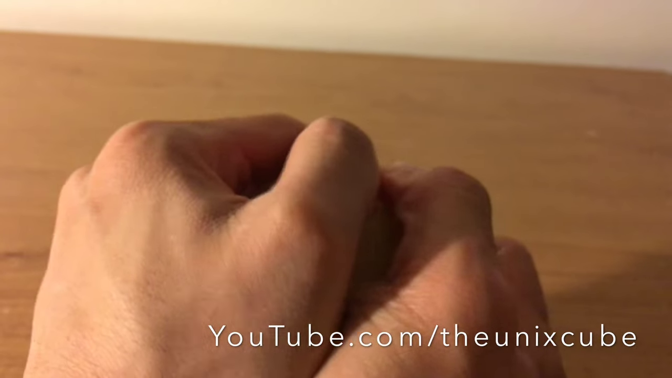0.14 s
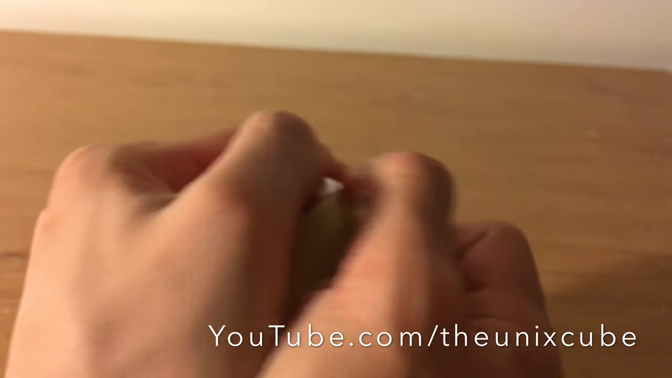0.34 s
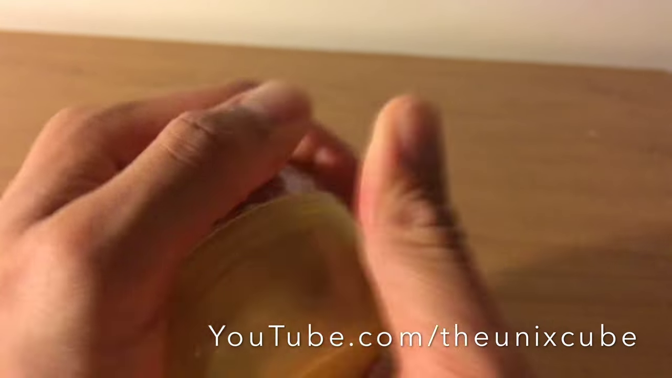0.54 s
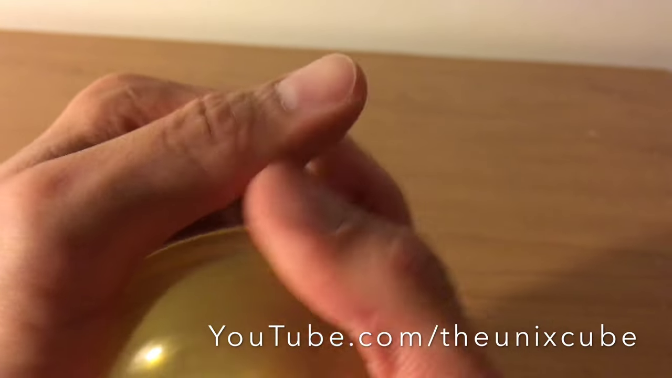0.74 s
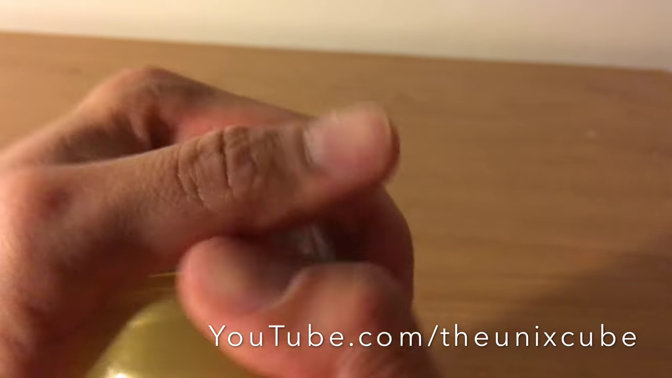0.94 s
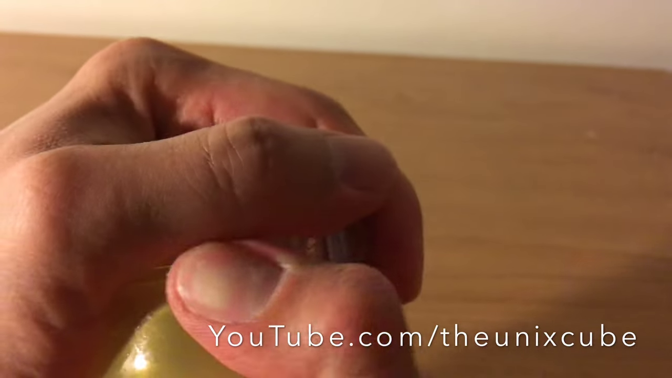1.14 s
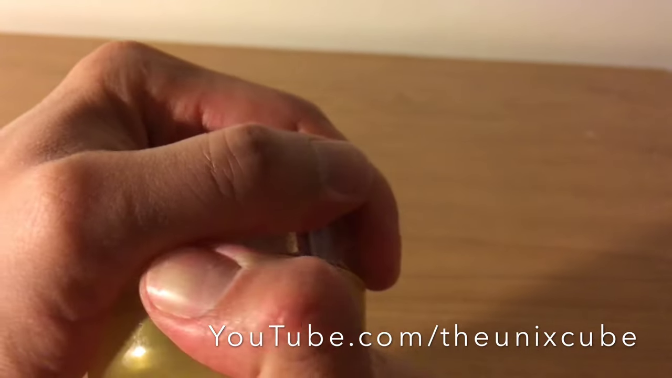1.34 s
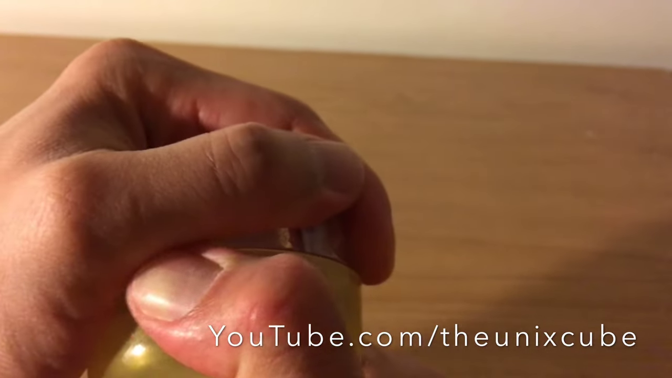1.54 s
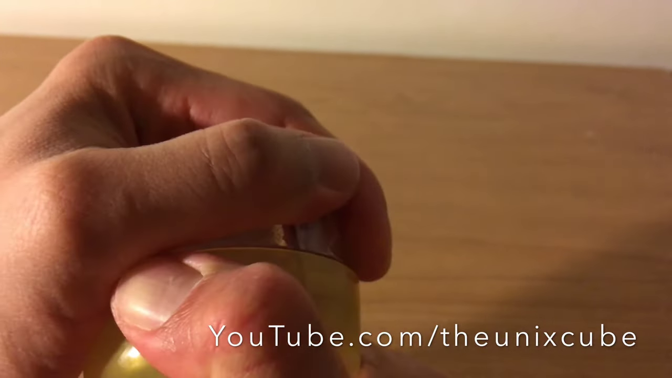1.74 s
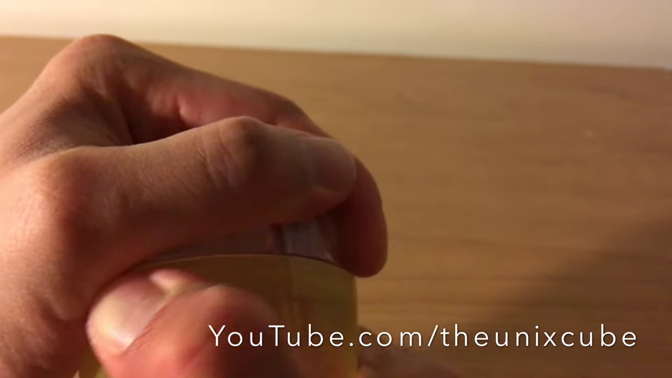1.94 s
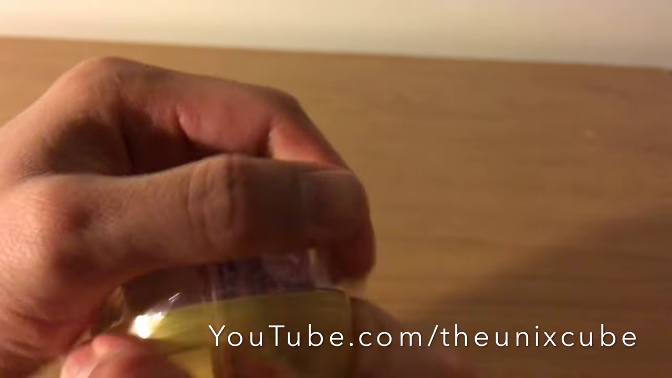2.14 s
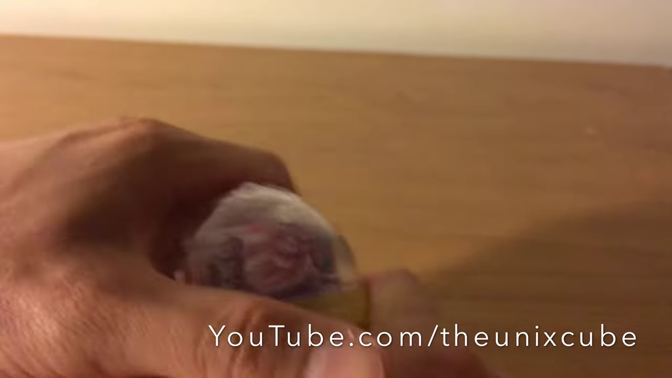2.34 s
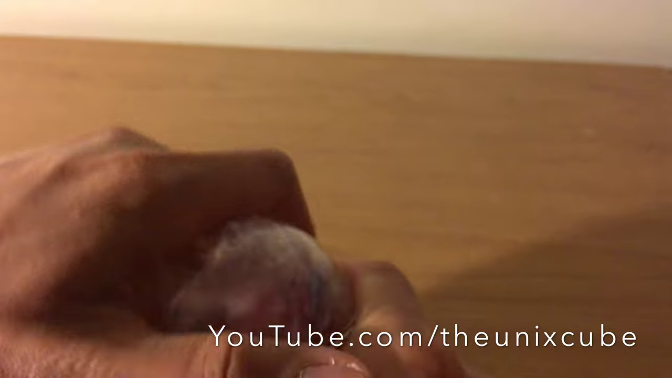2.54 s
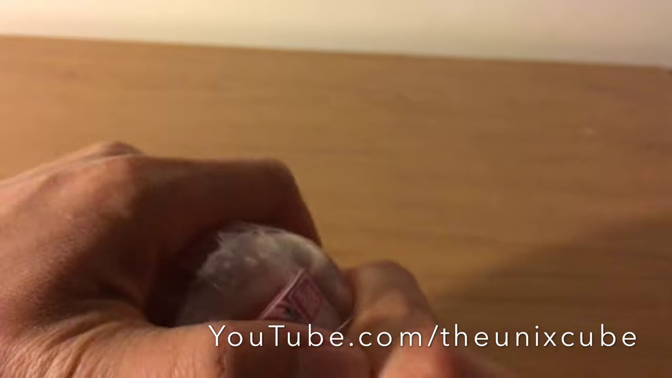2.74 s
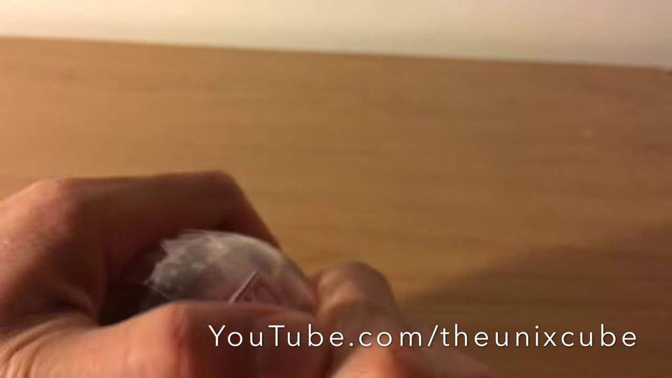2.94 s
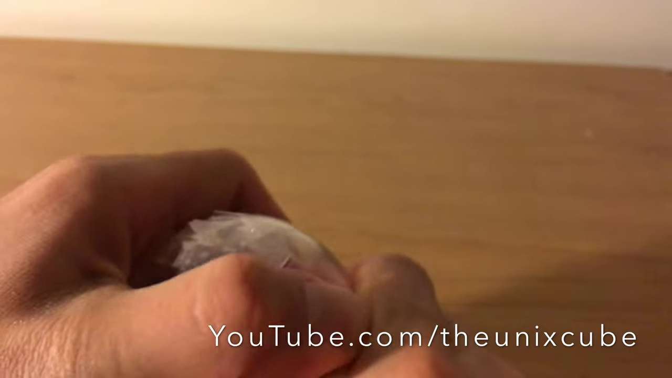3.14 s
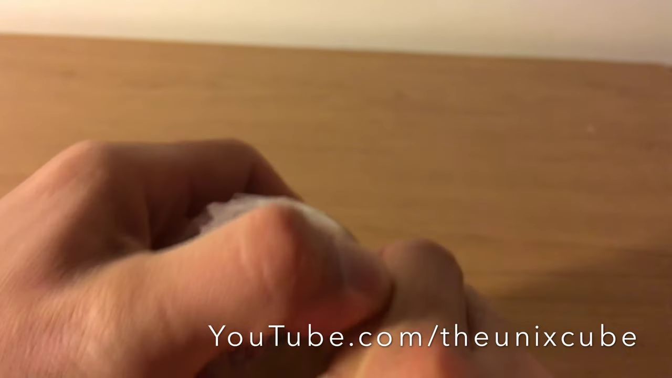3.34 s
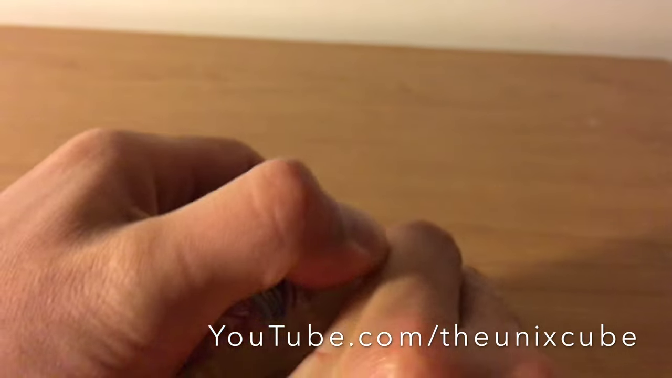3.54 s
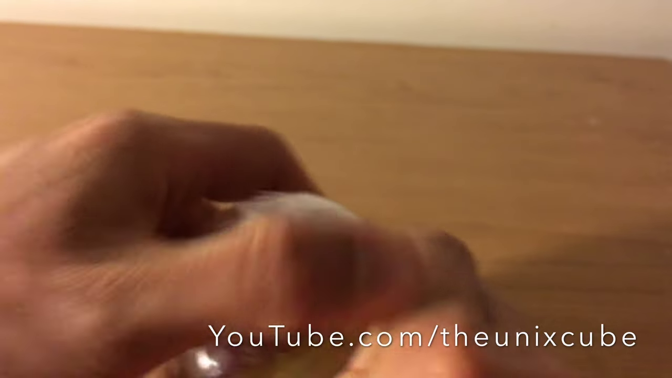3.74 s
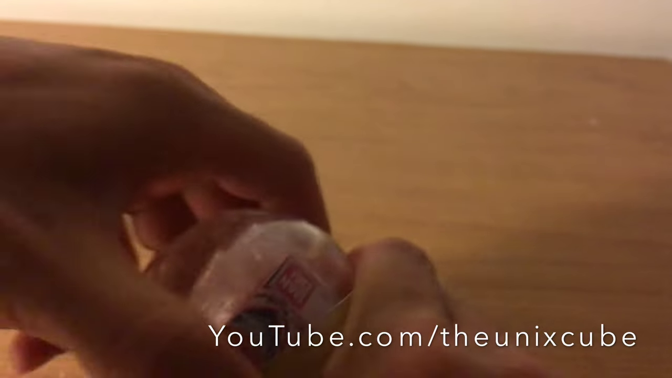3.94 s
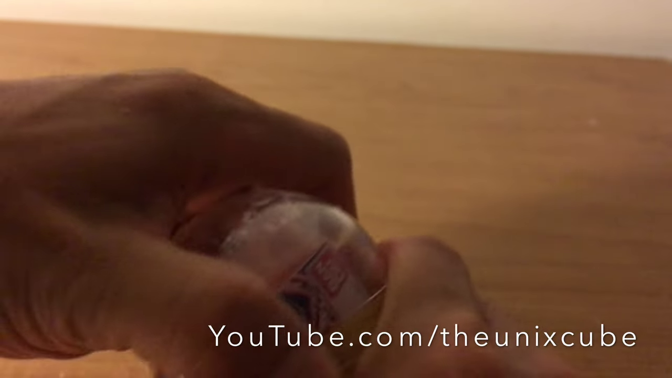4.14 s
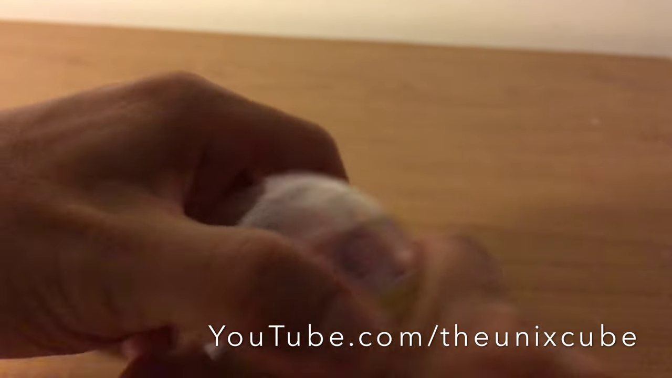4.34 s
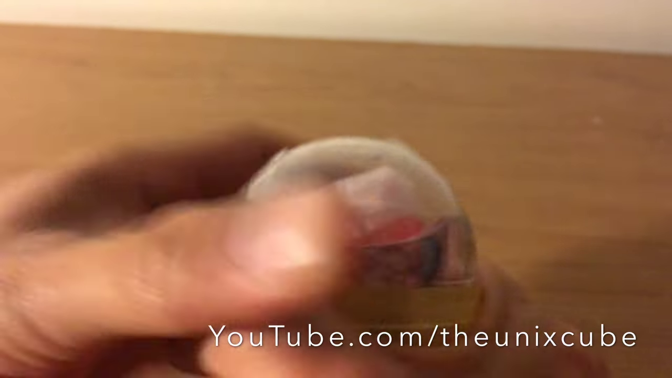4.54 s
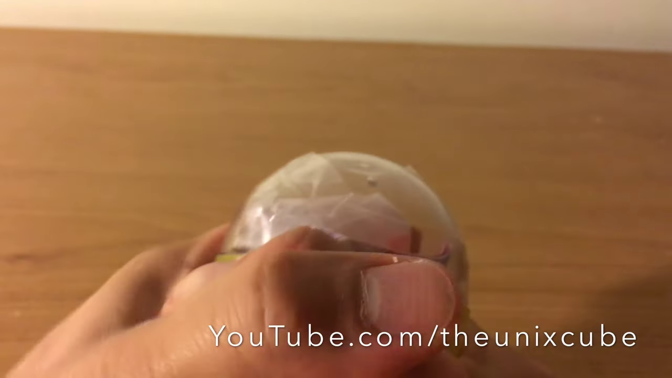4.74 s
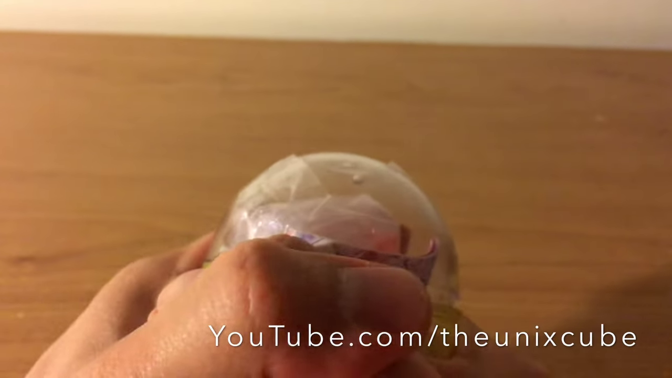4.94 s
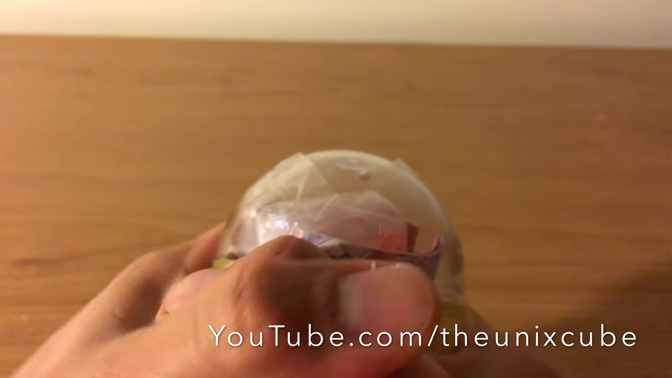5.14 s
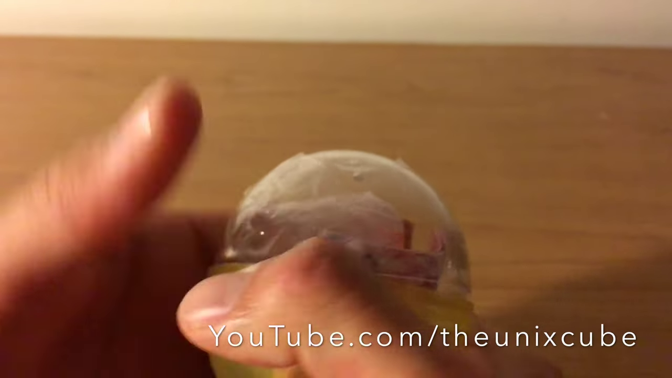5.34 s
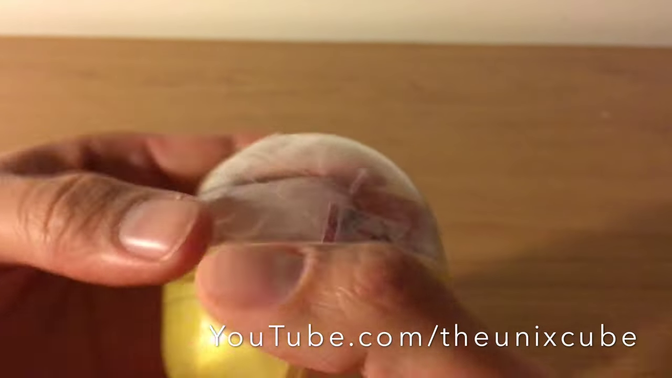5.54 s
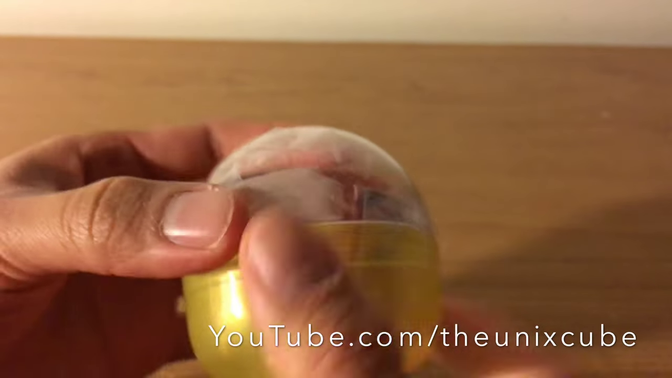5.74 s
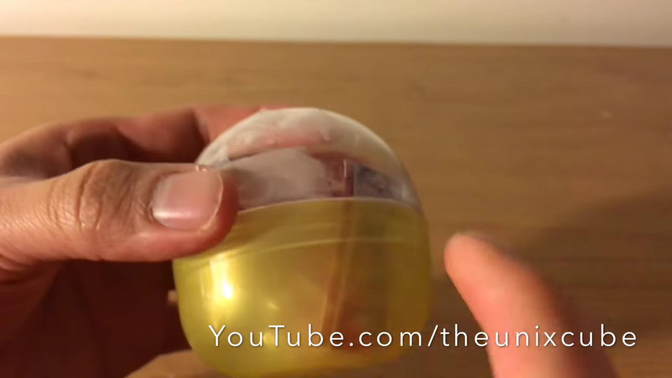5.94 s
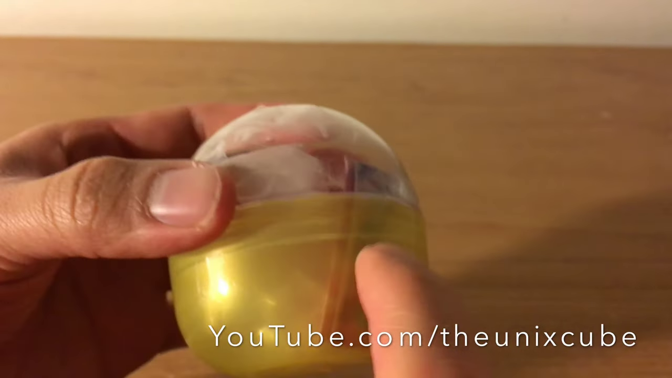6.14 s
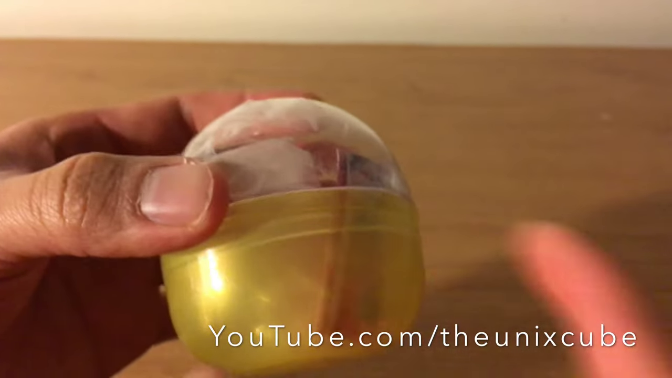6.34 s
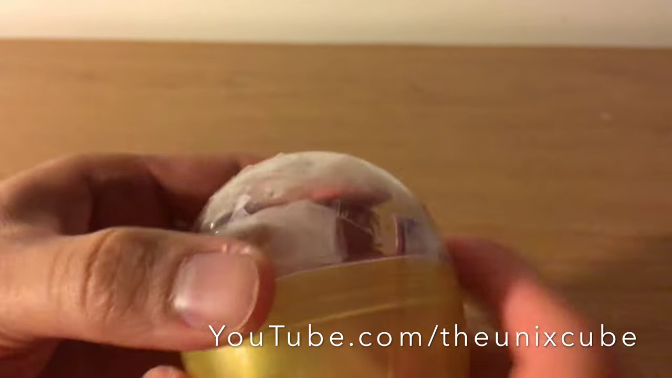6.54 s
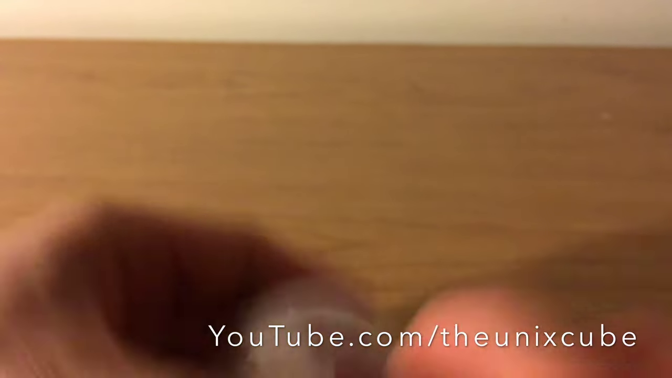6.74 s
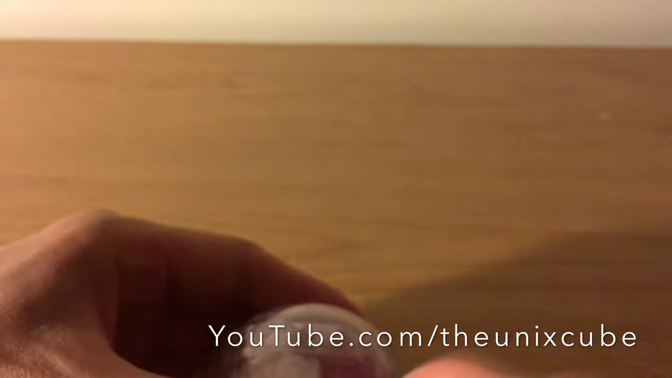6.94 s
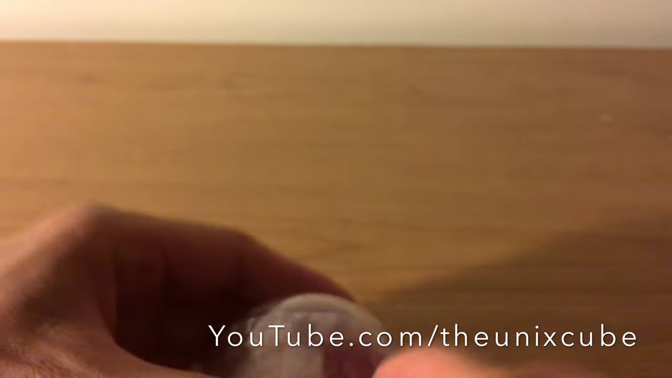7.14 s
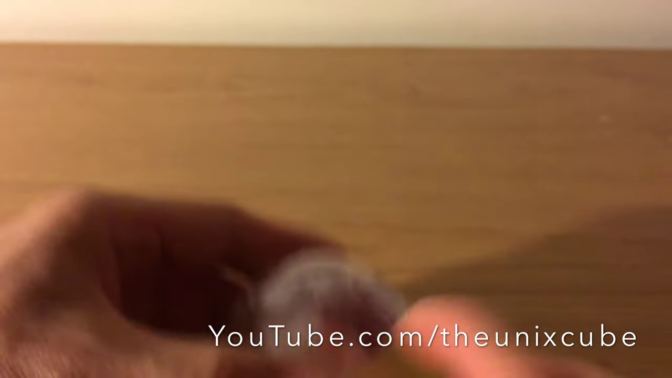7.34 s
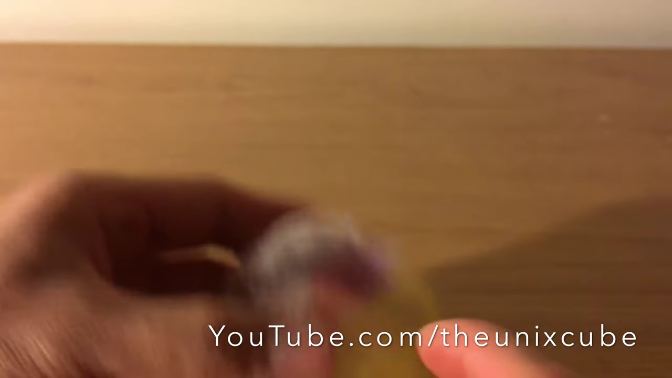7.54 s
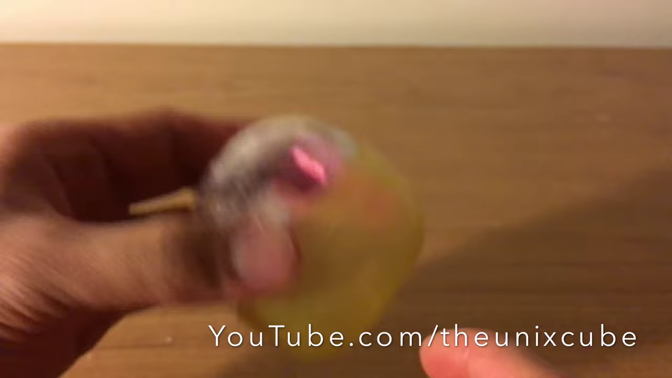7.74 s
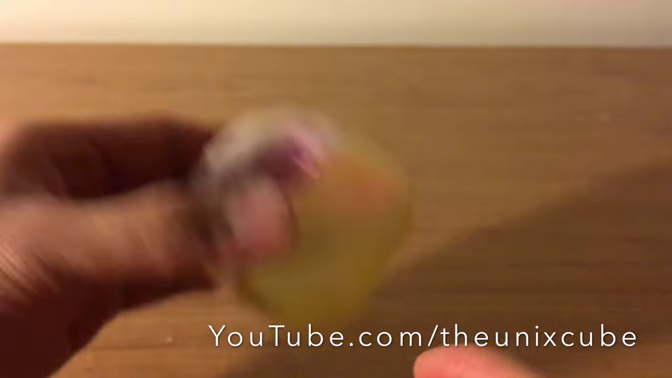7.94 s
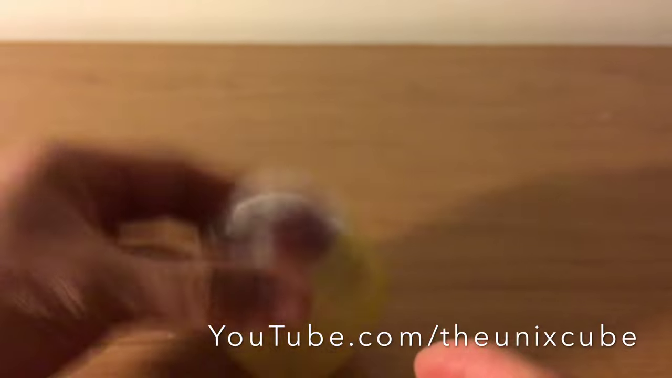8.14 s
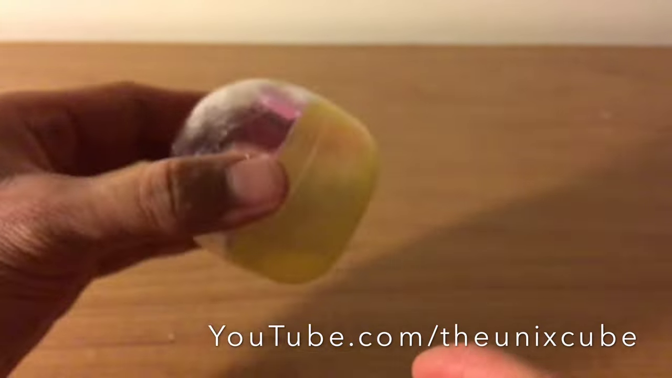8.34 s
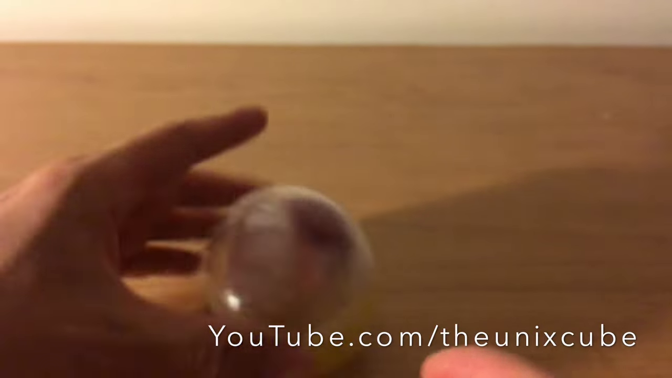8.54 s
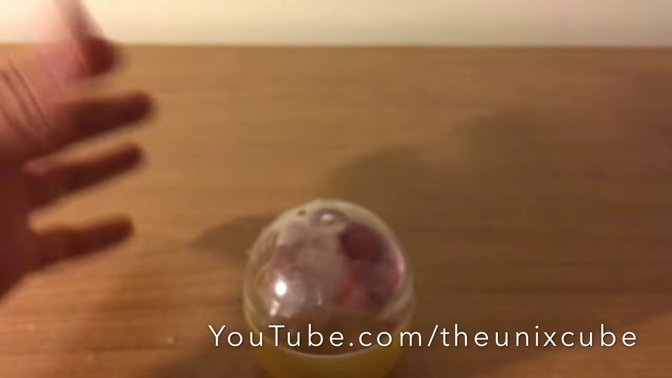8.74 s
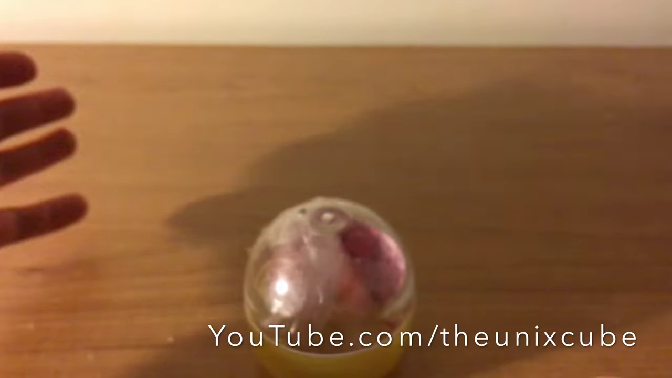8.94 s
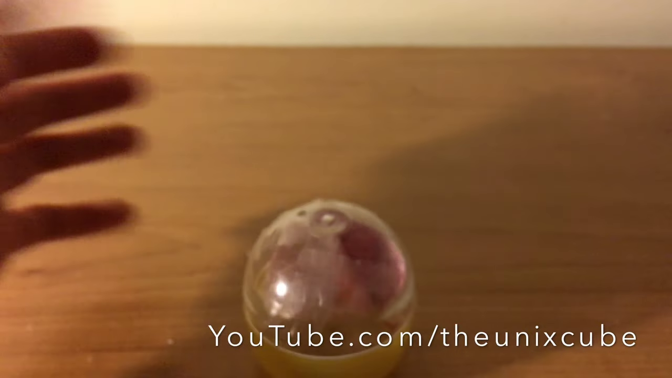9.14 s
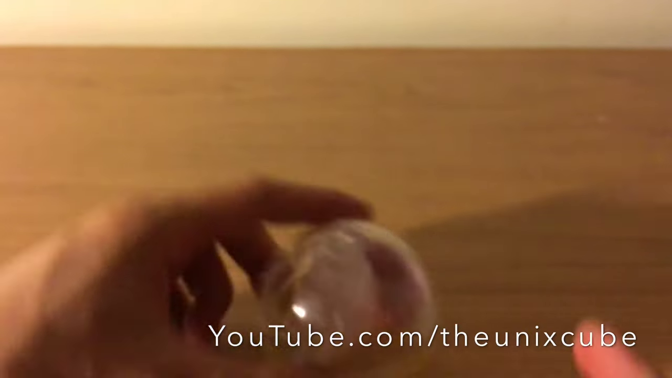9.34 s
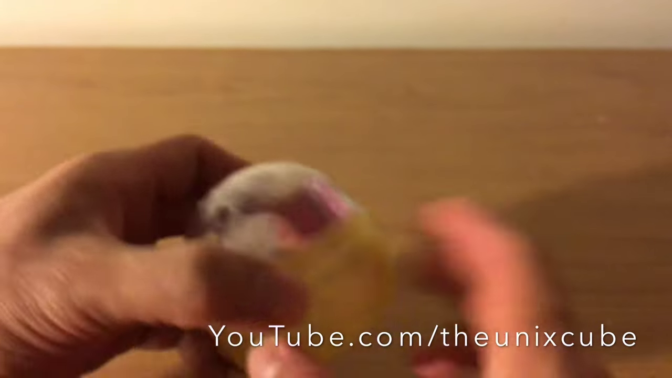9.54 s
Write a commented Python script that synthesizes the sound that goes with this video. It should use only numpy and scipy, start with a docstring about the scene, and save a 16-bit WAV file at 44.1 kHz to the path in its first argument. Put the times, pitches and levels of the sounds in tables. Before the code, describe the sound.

Hands work a small hollow plastic capsule close to the microphone in a small quiet room. Soft finger hiss, faint creaks and seam ticks come first, then a sharp snap with a dull bump near the middle. Afterwards the capsule is knocked firmly on a wooden desk seven times, each a woody thud with a brief plastic rattle. It rocks to rest, then is scraped and picked up again.

```python
"""Plastic capsule handled and knocked on a desk

Hands work a hard plastic capsule: sliding fingers hiss by stick-slip, and its seam ticks, creaks and snaps
as brief noise bursts filtered by the hollow shell's resonances. Held bumps are heavily damped low swings.
Seven firm knocks on a wooden desk ring decaying modes, with a dense thud and a rattle of the two halves;
it rocks to rest and is picked up again. A small quiet room adds low tone and a short reverberant tail.
"""
import sys
import numpy as np
from scipy import signal
from scipy.fft import rfft, irfft, next_fast_len
from scipy.io import wavfile
from scipy.ndimage import uniform_filter1d, map_coordinates

SR = 44100
rng = np.random.default_rng(int(sys.argv[2]) if len(sys.argv) > 2 else 0)


def inscribe(sig):
    """Save sig as 16-bit PCM at rate SR to the path in sys.argv[1].

    A 1-D sig is mono; a 2-D sig holds one channel per row.
    Samples are clipped to [-1, 1] before scaling.
    """
    pcm = np.round(np.clip(np.atleast_2d(sig).T, -1, 1) * 32767)
    wavfile.write(sys.argv[1], SR, pcm.astype(np.int16))


N = 426874


def amp(db):
    """Decibel definition: level to amplitude gain."""
    return 10 ** (np.asarray(db) / 20)


def unit(x):
    """Power normalisation: scale to rms 1."""
    return x / np.sqrt(np.mean(x ** 2) + 1e-20)


def struck(x):
    """Onset normalisation: scale a blow to rms 1 over its first hundredth of a second."""
    return x / np.sqrt(np.mean(x[:SR // 100] ** 2) + 1e-20)


def along(points, hz):
    """Logarithmic frequency scale: read (hz, value) points on a log axis."""
    f, v = np.transpose(points)
    return np.interp(np.log(hz + 1), np.log(f + 1), v)


def filtered(x, response):
    """Linear filtering: multiply the spectrum of x by a response of frequency."""
    m = next_fast_len(len(x) + 8192)
    return irfft(rfft(x, m) * response(np.fft.rfftfreq(m, 1 / SR)), m)[:len(x)]


def coloured(x, gain):
    """Minimum phase: a causal filter derived from its gain by folding the cepstrum."""
    size = 2048
    cepstrum = irfft(np.log(np.maximum(gain(np.fft.rfftfreq(size, 1 / SR)), 1e-6)))
    cepstrum[1:size // 2] *= 2
    cepstrum[size // 2 + 1:] = 0
    impulse_response = irfft(np.exp(rfft(cepstrum)))
    return signal.fftconvolve(x, impulse_response)[:len(x)]


def noise(spectrum, grain=1):
    """Spectral shaping: noise of rms 1 with the given spectrum, its strength roughened by grain."""
    return unit(filtered(grain * rng.standard_normal(N), lambda hz: amp(along(spectrum, hz))))


def wobble(rate):
    """Band-limited fluctuation: a smooth random curve with rate knots a second."""
    knots = rng.standard_normal(int(N * rate / SR) + 4)
    return map_coordinates(knots, [np.arange(N) * rate / SR])


def fade(t, t60):
    """Exponential decay: 60 dB in t60."""
    return np.exp(-np.log(1000) * t / t60)


def add(track, s, x):
    """Superposition: mix x into the track at time s."""
    part = track[round(s * SR):][:len(x)]
    part += x[:len(part)]


def band(hz, centre_hz, spread):
    """Band-pass gain: a hump reaching spread octaves either side of its centre."""
    return 1 / np.sqrt(1 + (np.log2((hz + 1) / centre_hz) / spread) ** 6)


def radiated(x, corner_hz=58):
    """Radiation efficiency: small bodies send out little deep bass."""
    return signal.sosfilt(signal.butter(2, corner_hz, "high", fs=SR, output="sos"), x)


def in_room(x, wet_db, delay=.006):
    """Reverberation: add a delayed, fresh noise tail in which each frequency dies at its own speed."""
    # reverberation of the small room: hz, t60_s
    room_decay = [(150, 0.52), (600, 0.29), (2000, 0.26), (6000, 0.25), (15000, 0.29)]
    hz, t, z = signal.stft(rng.standard_normal(SR // 2), SR, nperseg=256)
    decaying = z * fade(t, along(room_decay, hz)[:, None])
    tail = signal.istft(decaying, SR, nperseg=256)[1]
    tail = np.pad(tail / np.linalg.norm(tail), (round(delay * SR), 0))
    return x + amp(wet_db) * signal.fftconvolve(x, tail)[:len(x)]


def shell(hz, between_db=-11):
    """Shell resonance: power sum of the hollow shell's resonances over a broad base, as a gain."""
    # resonances of the hollow shell: pitch_hz, width_hz, level_db
    resonances = [(900, 660, 4), (1915, 230, 1), (2410, 310, -0.5), (2950, 200, -0.5), (3325, 190, 2.5),
                  (3730, 260, 1), (4480, 160, -3.5), (5446, 340, 2), (6550, 380, -4.5), (7430, 360, -4.5),
                  (8700, 770, -8), (9530, 430, -7.5), (11500, 760, -11.5), (13500, 3400, -9)]
    power = sum(amp(db) ** 2 / (1 + (2 * (hz - f) / w) ** 2) for f, w, db in resonances)
    return np.sqrt(amp(between_db) ** 2 + power)


def slip(centre_hz, spread, t60):
    """Impulsive excitation: a brief noise burst excites the shell resonances around centre_hz."""
    t = np.arange(SR // 3) / SR
    burst = rng.standard_normal(len(t)) * fade(t, t60)
    return struck(coloured(burst, lambda f: shell(f) * band(f, centre_hz, spread)))


def background(quiet_db=-65.2, hiss_db=-61):
    """Stationary noise: low room tone, and a hiss that steps up in a few spells."""
    # room tone: hz, level_db (relative, per Hz)
    quiet_spectrum = [(15, -25), (35, -4.5), (60, 3.5), (110, -4.5), (200, -9), (350, -14.5), (570, -20),
                      (1150, -23.5), (16000, -34.5)]
    # added hiss: hz, level_db (relative, per Hz)
    hiss_spectrum = [(150, -20.5), (300, 1), (800, -2.5), (1060, -9.5), (2000, -9.5), (7000, -14.5),
                     (16000, -20.5)]
    # spells of added hiss: start_s, end_s
    hiss_spells = [(7.05, 7.25), (7.55, 7.6), (7.92, 8.965)]
    t = np.arange(N) / SR
    steps = sum(1.0 * ((t > a) & (t < b)) for a, b in hiss_spells)
    raised = uniform_filter1d(steps, size=400)  # softens the edges
    return amp(quiet_db) * noise(quiet_spectrum) + amp(hiss_db) * raised * noise(hiss_spectrum)


def strokes(rows, power, grows=1):
    """Sliding friction: speed rises and falls to a stop, and the gain follows a power of that speed."""
    t = np.arange(N) / SR
    rise_share = 0.38  # part of a stroke spent speeding up
    gain = np.zeros(N)
    for s, length, db in rows:
        corners = [s - rise_share * length, s, s + (1 - rise_share) * length]
        speed = np.interp(t, corners, [0, 1, 0])
        gain += amp(grows * db) * speed ** power
    return gain


def rubbing(grain_db=3, catch_db=2.5, grit_db=-7, grit_scatter_db=5, grit_hz=1800):
    """Stick-slip friction: tiny slips hiss, harder catches crackle in the shell, the body murmurs."""
    # fingers sliding on the shell: fastest_s, length_s, level_db
    rub_strokes = [(0.29, 0.21, -68.5), (0.59, .34, -52.5), (0.85, .6, -58.5), (1.28, 0.62, -70),
                   (2.185, .17, -57.5), (2.325, .13, -52.5), (2.378, .05, -54), (2.418, .06, -59),
                   (2.6, 0.24, -59.5), (3.85, 0.36, -60.5), (4.45, .11, -54), (4.555, 0.17, -60),
                   (4.685, 0.12, -60.5), (5.33, 0.086, -54), (5.57, 0.52, -61.5), (9.53, 0.22, -57.5)]
    # the base dragging on the desk: fastest_s, length_s, level_db
    drag_strokes = [(5.84, 0.4, -54.5), (9.4, .17, -44)]
    # finger hiss: hz, level_db (relative, per Hz)
    skin_spectrum = [(400, -23), (900, -6), (2500, -6.5), (9000, -2), (16000, -4.5)]
    # hollow body's murmur: hz, level_db (relative, per Hz)
    body_spectrum = [(90, -7), (150, 0), (240, -7), (345, 4), (480, -11), (1200, -19), (2500, -22),
                     (5000, -68)]
    murmur_db, murmur_grows = -41.5, 0.41  # murmur at a 0 dB stroke; dB gained per dB of hiss
    drag_hiss_db, drag_rasp_db, drag_rasp_hz = -7.5, -6, 3800  # levels against the drag's murmur

    drag = strokes(drag_strokes, power=1.3)
    hiss_gain = strokes(rub_strokes, power=1.61) + amp(drag_hiss_db) * drag
    body_gain = amp(murmur_db) * strokes(rub_strokes, power=1.2, grows=murmur_grows) + drag
    grain = amp(grain_db * wobble(900) + catch_db * wobble(70))
    catches = rng.standard_normal(N) * amp(grit_scatter_db * np.minimum(wobble(220), 2))
    grit = unit(coloured(catches, lambda f: shell(f) * band(f, grit_hz, 2.2)))
    scrape = grain * rng.standard_normal(N)
    rasp = unit(coloured(scrape, lambda f: shell(f) * band(f, drag_rasp_hz, 0.86)))
    hiss = hiss_gain * (noise(skin_spectrum, grain) + amp(grit_db) * grit)
    murmur = body_gain * noise(body_spectrum, grain)
    return hiss + murmur + amp(drag_rasp_db) * drag * rasp


def bumps(rise=0.00042, cycles=11):
    """Damped oscillation: a soft contact is one low swing that the hand damps 60 dB in a few cycles."""
    # held capsule bumping against hand and desk: start_s, level_db, pitch_hz
    bump_rows = [(0.932, -58, 190), (2.206, -54, 340), (2.232, -50.5, 320), (2.269, -39.5, 318),
                 (2.272, -45, 140), (2.601, -54, 230), (3.857, -58, 296), (3.905, -53.5, 272),
                 (4.8625, -35, 175), (5.32, -53.5, 220), (5.596, -54, 190), (5.67, -47, 344),
                 (5.676, -37.5, 138), (5.82, -50, 130), (6.174, -49.5, 135), (9.366, -39.5, 168),
                 (9.516, -47, 242)]
    out, t = np.zeros(N), np.arange(SR // 3) / SR
    for s, db, hz in bump_rows:
        swing = np.sin(2 * np.pi * hz * t) * fade(t, cycles / hz) * (1 - np.exp(-t / rise))
        add(out, s, in_room(amp(db) * struck(swing), wet_db=-12))
    return radiated(out)


def creak(start, end, rate, db, centre_hz):
    """Repeated stick-slip: a row of slips, uneven in time and level, laid out like the clicks."""
    times = np.arange(start, end, 1 / rate)
    late, louder = rng.uniform(-1, 1, (len(times), 2)).T
    uneven_times = times + .5 * late / rate
    return [(s, level, centre_hz) for s, level in zip(uneven_times, db + 4 * louder)]


def clicks(t60=.010):
    """Transient excitation: single slips of seam and nails, and the creak of the first squeeze."""
    # seam and fingernails clicking: start_s, level_db, centre_hz
    click_rows = [(0.621, -48.5, 2500), (0.671, -58, 9000), (0.923, -59.5, 5000), (1.948, -56.5, 10900),
                  (2.267, -44, 6500), (2.600, -44.5, 1500), (3.178, -63, 3000), (3.801, -59.5, 1290),
                  (3.853, -60, 1200), (4.075, -54.5, 15000), (4.381, -56, 8600), (4.573, -57.5, 1200),
                  (5.317, -55.5, 1700), (5.358, -61, 1200), (5.592, -50, 4530), (6.17, -55, 7500),
                  (6.287, -65, 7000), (6.542, -54.5, 7000), (6.822, -55, 1000), (6.8575, -27, 3500),
                  (7.206, -34, 4500), (7.397, -35, 4400), (8.187, -44.5, 12000), (9.3557, -43.5, 11000),
                  (9.516, -39.5, 580), (9.556, -54, 5000), (9.655, -48.5, 10000)]
    # dull knocks and bright nail ticks are the narrowest: centre_hz, spread_octaves
    click_spread = [(800, 0.79), (2200, 1.5), (6500, 1.6), (11000, .75)]
    squeeze = creak(start=0.11, end=0.34, rate=55, db=-68, centre_hz=850)  # rate in slips per second
    out = np.zeros(N)
    for s, db, hz in click_rows + squeeze:
        click = slip(hz, along(click_spread, hz), t60)
        add(out, s, in_room(amp(db) * click, wet_db=-13.5))
    return out


def pings(spread=.2, overtone_db=-8, overtone_spread=.2, overtone_t60=.018):
    """Resonance: the rim, springing free, sounds one narrow band and, more weakly, its octave."""
    # rim springing free: start_s, level_db
    ping_rows = [(2.7135, -44.5), (4.8605, -40)]
    ping_hz, ping_t60_s = 1900, .024
    out = np.zeros(N)
    for s, db in ping_rows:
        overtone = slip(2 * ping_hz, overtone_spread, overtone_t60)
        ring = slip(ping_hz, spread, ping_t60_s) + amp(overtone_db) * overtone
        add(out, s, in_room(amp(db) * ring, wet_db=-15))
    return out


def snap(count=4, t60=.011):
    """Snap-through: the lip rides over its ridge in slips, each deeper and louder than the last."""
    start_s, length_s, first_db, swell_db = 4.859, .0035, -44, 9.5
    from_hz, to_hz, spread_octaves = 11000, 300, .8  # from a tick to a knock
    out = np.zeros(N)
    for part in np.linspace(0, 1, count):
        hz = from_hz * (to_hz / from_hz) ** part
        burst = amp(first_db + part * swell_db) * slip(hz, spread_octaves, t60)
        add(out, start_s + part * length_s, in_room(burst, wet_db=-17))
    return out


def chatter(t, force, gap=.0048, loss_db=-7, t60=0.013):
    """Restitution: the loose halves rebound ever more weakly, and a light knock hardly bounces."""
    starts = np.cumsum(np.r_[0, gap * rng.uniform(.7, 1.3, size=3)])
    rebound = amp(loss_db) * np.sqrt(force)
    envelope = sum(rebound ** k * (t >= s) * fade(np.abs(t - s), t60) for k, s in enumerate(starts))
    return envelope * rng.standard_normal(len(t))


def knocks(rattle_hz=2700, rattle_top_hz=15000, thud_hz=330, thud_spread=1.37, thud_t60=.07,
           thud_db=-10, scatter_db=2.5):
    """Modal excitation: a knock rings desk modes over a thud; the halves chatter and the rim rings."""
    # capsule on the desk: start_s, level_db, rim_catch_db
    knock_rows = [(6.8426, -13, 2.5), (6.994, -36, -4.5), (7.039, -33, 4.5), (7.1919, -18.5, -3),
                  (7.377, -15.5, -1.5), (7.538, -16, -4.5), (7.9006, -14, -1.5), (8.2367, -13.2, .5),
                  (8.551, -14.5, 1), (8.749, -43.5, -6), (8.807, -44.5, -7.5), (9.3644, -42, -2)]
    # modes of the desk top with the capsule on it: pitch_hz, level_db, t60_s
    desk_modes = [(128, -18, .22), (154, -12, .25), (180, -17, .14), (214, -19, .18), (248, -16, .2),
                  (298, -14, .09), (335, -16, .11), (402, -6, .1), (455, -2, .06), (529, -1, .09),
                  (610, -10, .07), (693, -6, .075), (817, -2, .07), (910, -4, .055), (1065, -12, .045),
                  (1248, -9, .035), (1481, -5.5, .04), (1688, -11, .04), (1906, -13, .04), (2103, -16, .04),
                  (2262, -16, .03)]
    clack_db, rattle_db = -5.2, -8  # against the wood
    clack_follows = .25  # share of the rim's catch that reaches the clack
    clack_grows = .14  # a lighter knock is a softer contact: clack dB lost per dB under the hardest
    rim_tilt = 0.51  # a harder catch thins the desk's bass: dB per octave for each dB of catch
    ring_hz, ring_db, ring_t60_s, ring_width_hz = 5370, -28, .28, 150  # level against the rattle

    def rim(f):
        """Resonance curve of the rim."""
        return 1 / (1 + (2 * (f - ring_hz) / ring_width_hz) ** 2)

    def halves(f):
        """Shell resonances with bass and extreme treble rolled off."""
        return shell(f) * f ** 2 / (f ** 2 + rattle_hz ** 2) / np.hypot(1, f / rattle_top_hz)

    out, t = np.zeros(N), np.arange(SR // 3) / SR
    hz, level, t60 = np.transpose(desk_modes)
    low, detune = hz < 1000, .006
    hardest_db = max(row[1] for row in knock_rows)
    # neighbouring modes swing opposite ways
    decay = (-1) ** np.arange(len(hz))[:, None] * fade(t, t60[:, None])
    for s, db, rim_db in knock_rows:
        under_db = db - hardest_db
        strength, shift = rng.standard_normal((2, len(hz)))  # the capsule never lands on the same spot
        mode_db = level + scatter_db * strength + rim_tilt * rim_db * np.log2(hz / thud_hz)
        swings = np.sin(2 * np.pi * np.outer(hz * (1 + detune * shift), t))
        modes = amp(mode_db)[:, None] * decay * swings

        burst = rng.standard_normal(len(t)) * fade(t, thud_t60)
        thud = struck(coloured(burst, lambda f: band(f, thud_hz, thud_spread)))
        wood = in_room(struck(modes[low].sum(0)), wet_db=-16.5) + in_room(amp(thud_db) * thud, wet_db=-3.5)

        clack_gain = amp(clack_db + clack_follows * rim_db + clack_grows * under_db)
        clack = clack_gain * struck(modes[~low].sum(0))

        ring = amp(ring_db) * unit(filtered(rng.standard_normal(len(t)), rim)) * fade(t, ring_t60_s)
        bounces = struck(coloured(chatter(t, amp(under_db)), halves))
        rattle = amp(rattle_db + rim_db) * (bounces + ring)
        add(out, s, amp(db) * (wood + in_room(clack, wet_db=-14.0) + in_room(rattle, wet_db=-17)))
    return radiated(out)


def scene():
    """Superposition: all sources, heard from one point close to the hands."""
    return (background() + rubbing() + bumps() + clicks() + pings() + snap() + knocks())[None]


def record(dry, top=0.9, top_hz=15850):
    """Transduction: the microphone colours the treble, peaks saturate softly, a steep low-pass ends it."""
    # microphone response: hz, level_db
    microphone = [(9900, -0.5), (10400, -4.5), (11400, 0), (14000, -1.5), (15500, -4.5)]
    heard = coloured(dry[0], lambda hz: amp(along(microphone, hz)))
    rounded = heard / (1 + np.abs(heard / top) ** 6) ** (1 / 6)
    return filtered(rounded, lambda hz: 1 / (1 + (hz / top_hz) ** 160))[None]


dry = scene()
out = record(dry)
inscribe(out)
```